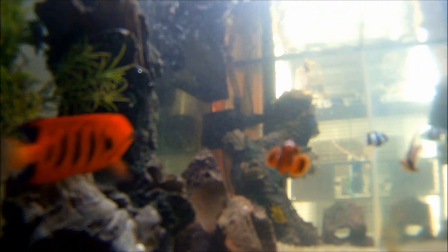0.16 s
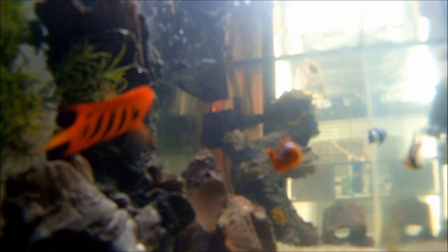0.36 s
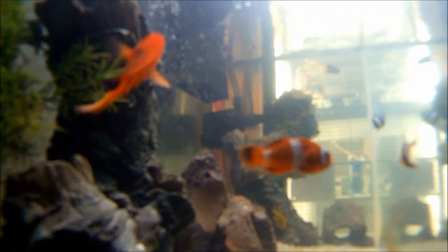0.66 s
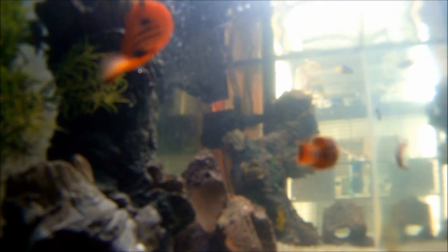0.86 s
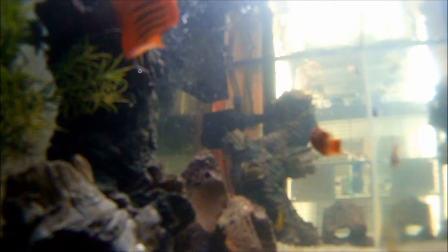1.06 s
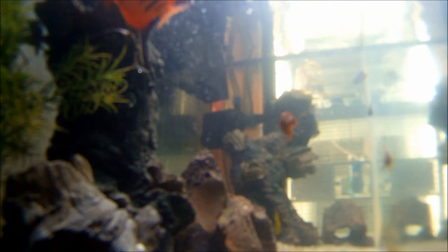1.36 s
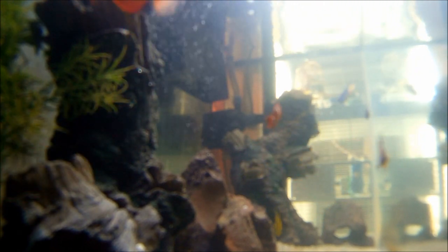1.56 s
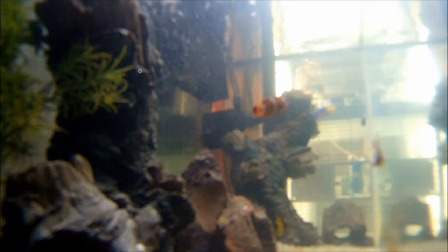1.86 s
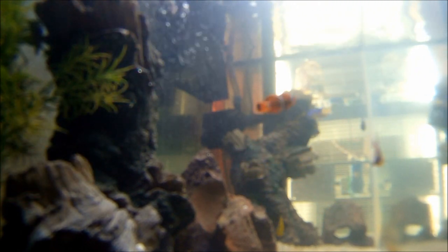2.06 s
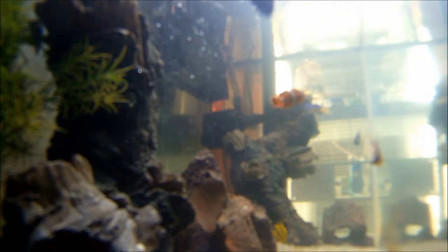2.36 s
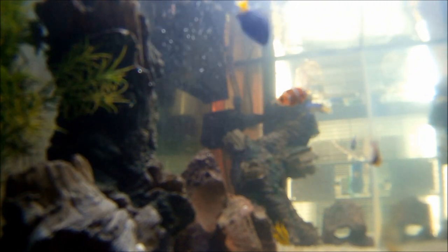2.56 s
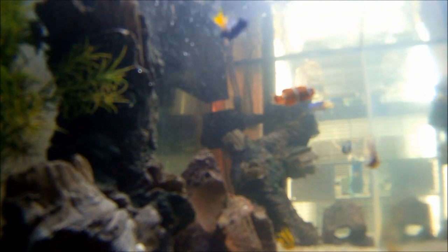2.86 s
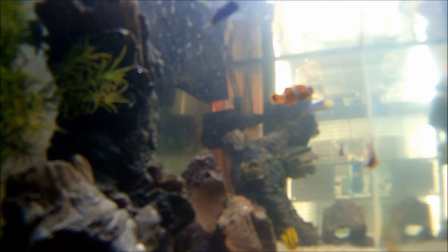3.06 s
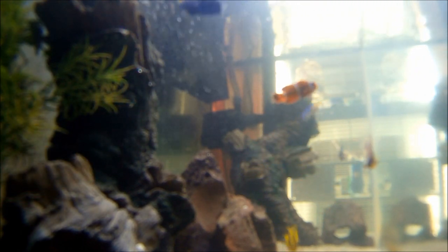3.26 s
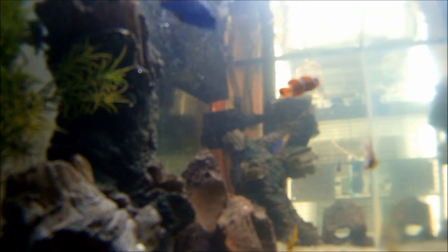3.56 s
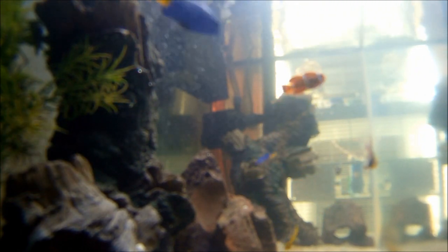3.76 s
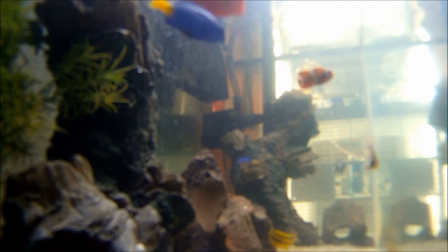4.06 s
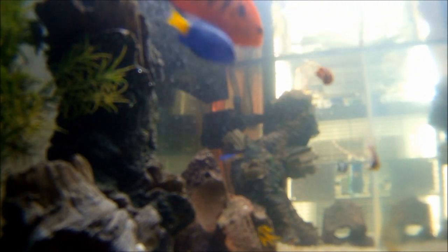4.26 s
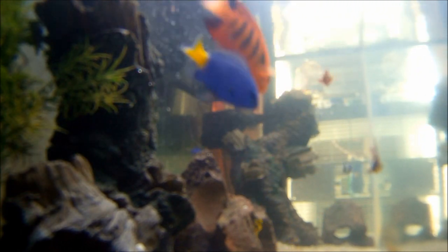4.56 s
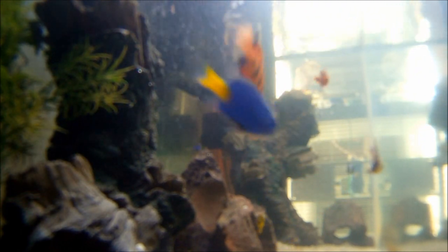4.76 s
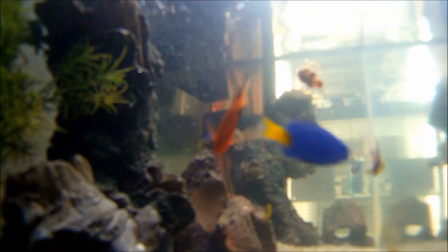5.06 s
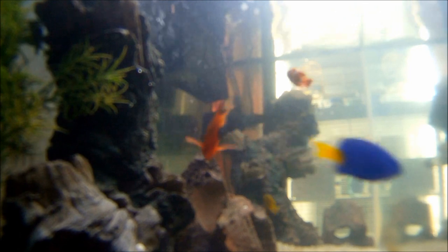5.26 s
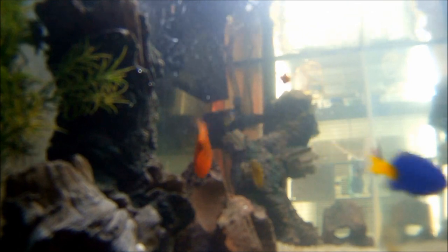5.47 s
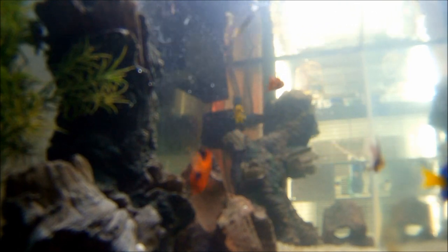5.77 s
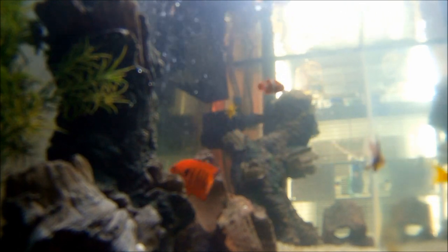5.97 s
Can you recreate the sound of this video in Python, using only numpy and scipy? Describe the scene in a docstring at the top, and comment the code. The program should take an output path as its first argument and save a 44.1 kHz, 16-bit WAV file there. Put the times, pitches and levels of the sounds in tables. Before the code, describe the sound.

A water pump hums low and steady for the whole six seconds, heard underwater in an aquarium through a sealed housing. With it come a hollow, muffled rumble of stirred water, a faint rapid rattle and a very faint high hiss. Small bubbles plop at irregular moments, mostly short mid-pitched blips with some fainter, higher ones. They cluster around 0.3 to 0.5 seconds and again from 1 to 1.5, then thin out until about 2.6. At about 3.5 seconds, four big bubbles break in a very quick row, a thumping gulp that is the loudest moment and is over by 3.7. Small plops come more often from 4.2 to 5 seconds. A single short, light click snaps on the housing at about 5.7 seconds, and a few more plops sound near 6 seconds over the unchanged hum.

```python
"""Aquarium from a submerged camera

Heard through a sealed housing. A mains-driven pump hums and rattles every cycle; stirred water
rings the resonances of tank and housing. Bubbles plop, small ticks snap, a few big bubbles gulp.
The camera holds each of its slow samples, so a mirror image of the sound hisses around 12 kHz."""
import sys
import numpy as np
from scipy import signal
from scipy.fft import rfft, irfft, next_fast_len
from scipy.io import wavfile
from scipy.ndimage import map_coordinates

SR = 44100
rng = np.random.default_rng(int(sys.argv[2]) if len(sys.argv) > 2 else 0)


def store_wav(level_fs):
    """Save 16-bit WAV to argv[1]."""
    pcm = np.round(np.clip(np.atleast_2d(level_fs), -1, 1) * 32767)
    wavfile.write(sys.argv[1], SR, pcm.T.astype(np.int16))


N = 270333
TIME_S = np.arange(N) / SR
MAINS_HZ = 59.9733

# Pump vibration: mains_multiple, rms_db
PUMP_HARMONICS = [(1, -36.0), (2, -25.1), (3, -40.5), (4, -36.3), (5, -44.4), (6, -44.6), (7, -51.6),
                  (8, -43.1), (9, -50.5), (10, -49.7), (11, -49.2), (12, -48.9), (14, -44.8), (16, -60.9),
                  (17, -61.3), (19, -62.3), (23, -62.2)]
# Tank and housing resonances: centre_hz, width_hz, gain_db
RESONANCES = [(41, 25, -15), (89, 34, -14), (136.2, 29, -6), (180, 12, -15), (250.6, 37.5, -6.5),
              (272.2, 31, -0.5), (312.4, 28, -9.5), (414, 49, -17), (483, 52, -16), (547.5, 48, -19),
              (660.4, 67, -14), (737, 54, -25.5), (842, 47, -16), (1003, 37, -24.5), (1174, 37, -25.5),
              (1378, 174, -25), (1980, 500, -39), (2150, 91, -31), (2430, 270, -40.5), (3093, 200, -43),
              (3646, 410, -42), (4200, 400, -53), (4930, 270, -54)]
# Floor under the resonances: freq_hz, gain_db
RESONANCE_FLOOR = [(15, -38.5), (30, -25.5), (200, -19.5), (800, -22.5), (950, -28.5), (2400, -36.5),
                   (2750, -50), (5000, -54), (6000, -63.5)]
# Rotor contacts within a mains cycle: phase_cycles, gain_db
ROTOR_CONTACTS = [(.61, -6.5), (.75, -3), (.87, 2.5), (.95, -2.5), (1.0, 0), (1.12, 2), (1.23, -8)]
# Distinct bubbles: start_s, pitch_hz, level_db
CLEAR_BUBBLES = [(0.033, 3150, -43), (0.04, 1800, -37), (0.075, 1690, -33), (0.286, 730, -23),
                 (0.303, 693, -16.5), (0.401, 900, -28), (0.454, 1625, -31), (0.482, 700, -31),
                 (0.532, 655, -18), (1.046, 683, -26), (1.123, 3750, -43), (1.23, 1610, -31),
                 (1.358, 652, -20), (1.517, 652, -24), (1.805, 1940, -34), (2.59, 775, -25.5),
                 (2.792, 3750, -45), (2.822, 660, -24), (3.025, 634, -29), (3.143, 1900, -36),
                 (3.254, 3160, -38.5), (3.514, 853, -23), (3.558, 2150, -31), (3.588, 688, -18.5),
                 (3.603, 670, -21), (3.611, 1580, -33), (3.673, 900, -27.5), (3.776, 468, -23),
                 (4.158, 1894, -29), (4.233, 1920, -33), (4.257, 643, -17), (4.377, 669, -22.5),
                 (4.597, 1840, -34), (4.624, 669, -14.5), (4.738, 660, -21), (4.822, 626, -19),
                 (4.822, 1582, -28), (4.949, 2120, -38), (4.994, 1444, -25), (5.412, 3730, -47),
                 (5.592, 780, -22), (5.611, 3750, -43), (5.861, 668, -18.5), (5.928, 648, -18),
                 (6.061, 630, -21)]
# Snaps on the housing: start_s, peak_db, centre_hz
HOUSING_TICKS = [(2.3281, -48, 4580), (5.3974, -45.5, 3170), (5.6655, -54, 2510), (5.7167, -30, 2460)]
# Big bubbles: start_s, pitch_hz, level_db, t60_s, rise_cycles
BIG_BUBBLES = [(3.525, 520, -4, 0.029, 2.1), (3.539, 570, -7.5, 0.032, 1.8), (3.560, 444, -4, 0.064, 0.68),
               (3.631, 478, -0.5, 0.025, 2)]


def amp(db):
    """Decibels to gain."""
    return 10 ** (np.asarray(db) / 20)


def unit_rms(x):
    """Scale to rms 1."""
    return x / np.sqrt(np.mean(x ** 2) + 1e-20)


def wobble(rate_hz):
    """Smooth random curve, knots at rate_hz."""
    return map_coordinates(rng.standard_normal(int(N * rate_hz / SR) + 4), [TIME_S * rate_hz])


def filtered(x, response):
    """Apply response(hz) by FFT."""
    size = next_fast_len(N + SR // 2)
    return irfft(rfft(x, size) * response(np.fft.rfftfreq(size, 1 / SR)), size)[..., :N]


def tank_response(hz):
    """Tank and housing, minimum phase: resonances add in power over a smooth floor."""
    floor_hz, floor_db = np.transpose(RESONANCE_FLOOR)
    power = amp(np.interp(np.log(hz + 1), np.log(floor_hz), floor_db)) ** 2
    for centre_hz, width_hz, gain_db in RESONANCES:
        power += (amp(gain_db) / (1 + (2 * (hz - centre_hz) / width_hz) ** 2)) ** 2
    cepstrum = irfft(np.log(power) / 2)
    half = len(cepstrum) // 2
    cepstrum[1:half] *= 2
    cepstrum[half + 1:] = 0
    return np.exp(rfft(cepstrum))


def rings(start_s, pitch_hz, level_db, t60_s, rise_cycles):
    """Sum of damped tones, each with a soft onset."""
    start_s, pitch_hz, level_db, t60_s, rise_cycles = (
        np.reshape(column, (-1, 1)) for column in (start_s, pitch_hz, level_db, t60_s, rise_cycles))
    age_s = np.arange(SR // 10) / SR
    swell = 1 - np.exp(-age_s * pitch_hz / rise_cycles)
    tones = amp(level_db - 60 * age_s / t60_s) * swell * np.sin(2 * np.pi * pitch_hz * age_s)
    index = np.round(start_s * SR).astype(int) + np.arange(len(age_s))
    return np.bincount(index.ravel(), tones.ravel(), N + SR)[:N]


def pump_hum():
    """Mains harmonics; the odd ones, from unequal half strokes, crest early."""
    hum = np.zeros(N)
    for k, rms_db in PUMP_HARMONICS:
        crest_cycles = 0.41 if k % 2 else 0.49
        spread_rad = 0.2 * max(k - 4, 0) ** 2
        phase_rad = 2 * np.pi * k * (MAINS_HZ * TIME_S - crest_cycles) + spread_rad
        waver_db = 0.2 * np.sqrt(k) * wobble(rate_hz=5)
        hum += np.sqrt(2) * amp(rms_db + waver_db) * np.cos(phase_rad)
    return hum


def stirred_water(rms_db=-29.5, lowpass_hz=1050):
    """Pump outlet turbulence rings the low resonances, surging slightly."""
    surge_db = 0.41 * wobble(rate_hz=1.5) + 0.61 * wobble(rate_hz=25)
    turbulence = amp(surge_db) * rng.standard_normal(N)
    rumble = filtered(turbulence, lambda hz: tank_response(hz) / (1 + (hz / lowpass_hz) ** 6))
    return amp(rms_db) * unit_rms(rumble)


def rotor_rattle(rms_db=-45.5, highpass_hz=950, t60_cycles=0.28):
    """The rotor chatters at the same points of every mains cycle, over a steady rush."""
    cycles = MAINS_HZ * TIME_S
    scatter_db = rng.standard_normal((int(cycles[-1]) + 3, len(ROTOR_CONTACTS)))
    envelope = np.full(N, 0.42)  # steady rush
    for k, (phase_cycles, gain_db) in enumerate(ROTOR_CONTACTS):
        turn, age_cycles = np.divmod(cycles - phase_cycles, 1)
        knock_db = gain_db + scatter_db[turn.astype(int) + 2, k]
        envelope += amp(knock_db - 60 * age_cycles / t60_cycles)
    chatter = envelope * rng.standard_normal(N)
    rattle = filtered(chatter, lambda hz: tank_response(hz) / (1 + (highpass_hz / (hz + 1)) ** 6))
    drift_db = 0.4 * wobble(rate_hz=3)
    return amp(rms_db + drift_db) * unit_rms(rattle)


def fizz(count=270, lowest_hz=496, scatter_db=5.5, gain_db=-37):
    """Faint random bubbles over a decade of pitch, coloured by the tank."""
    when, pitch, size = rng.random((count, 3)).T
    pitch_hz = lowest_hz * 10 ** pitch
    size_db = -scatter_db * np.log(size)
    faint = rings(when * N / SR, pitch_hz, size_db, t60_s=0.014 + 22 / pitch_hz, rise_cycles=3.7)
    return amp(gain_db) * filtered(faint, tank_response)


def plops():
    """Each clear bubble rings for some tens of cycles."""
    start_s, pitch_hz, level_db = np.transpose(CLEAR_BUBBLES)
    return rings(start_s, pitch_hz, level_db, t60_s=0.02 + 35.7 / pitch_hz, rise_cycles=3)


def ticks(t60_s=0.05):
    """Snaps on the housing: a spike and a dying noise puff through a broad, steep-sided resonance."""
    track = np.zeros(N + SR)
    age_s = np.arange(SR // 20) / SR
    for start_s, peak_db, centre_hz in HOUSING_TICKS:
        puff = 0.13 * amp(-60 * age_s / t60_s) * rng.standard_normal(len(age_s))
        puff[0] = 1  # spike
        shell = np.concatenate(signal.iirpeak(centre_hz, Q=1.25, fs=SR))
        snap = signal.sosfilt([shell] * 3, puff)
        track[round(start_s * SR):][:len(snap)] += amp(peak_db) * snap / np.abs(snap).max()
    return track[:N]


def gulps(thump_hz=275, thump_gain_db=-6.5, thump_t60_s=0.044, lag_s=0.0048):
    """Big bubbles break in a row; each thumps the tank's loudest resonance."""
    start_s, pitch_hz, level_db, t60_s, rise_cycles = np.transpose(BIG_BUBBLES)
    bubbles = rings(start_s, pitch_hz, level_db, t60_s, rise_cycles)
    thumps = rings(start_s + lag_s, thump_hz, level_db + thump_gain_db, thump_t60_s, rise_cycles)
    return bubbles + thumps


def scene():
    """All sources reach one microphone through the housing wall."""
    return (pump_hum() + stirred_water() + rotor_rattle() + fizz() + plops() + ticks() + gulps())[None]


def record(dry, hold_hz=12000, cutoff_hz=15267):
    """Sample-and-hold: the band mirrors around the hold rate, with a notch at that rate."""
    baseband = filtered(dry, lambda hz: hz < hold_hz / 2)
    mirrored = baseband * (1 + 2 * np.cos(2 * np.pi * hold_hz * TIME_S))
    hold_response = lambda hz: np.sinc(hz / hold_hz) / np.sinc(hz / (4 * hold_hz))
    return filtered(mirrored, lambda hz: hold_response(hz) * (hz < cutoff_hz))


dry = scene()
out = record(dry)
store_wav(out)
```